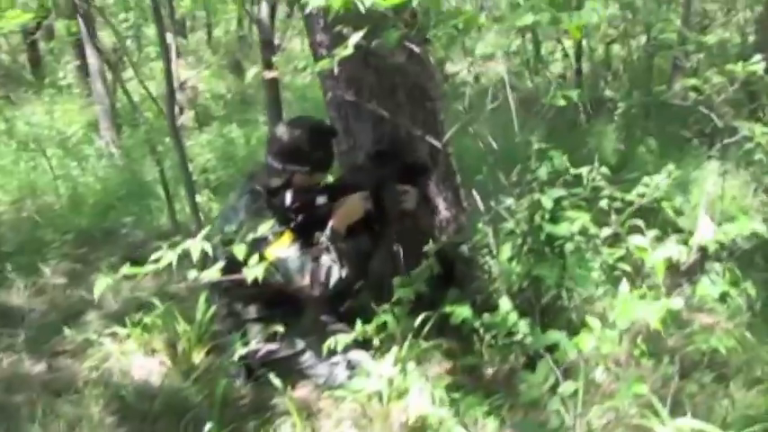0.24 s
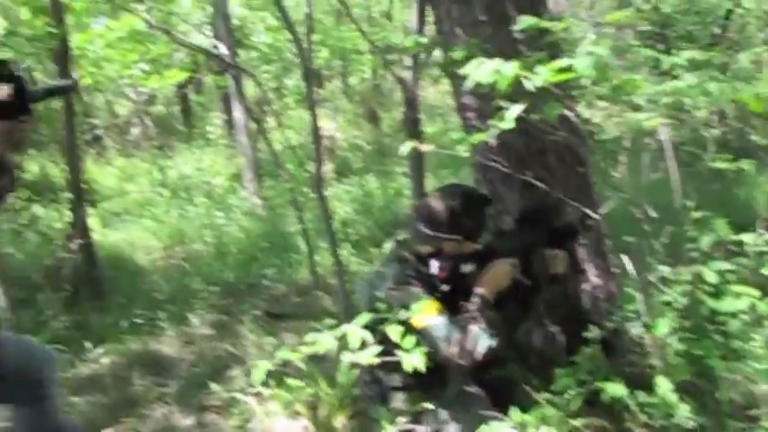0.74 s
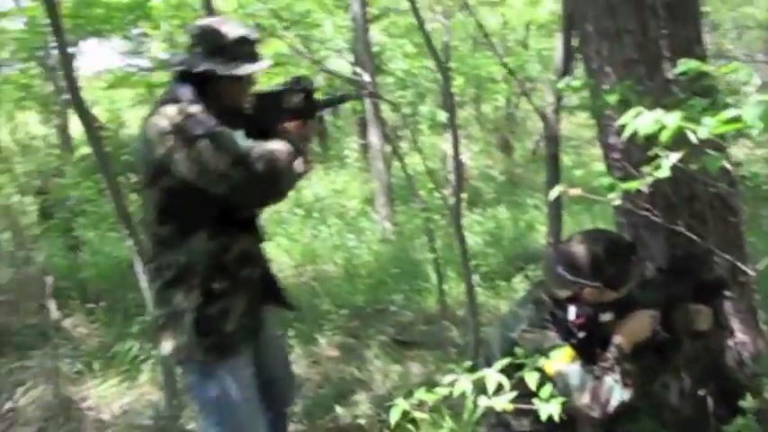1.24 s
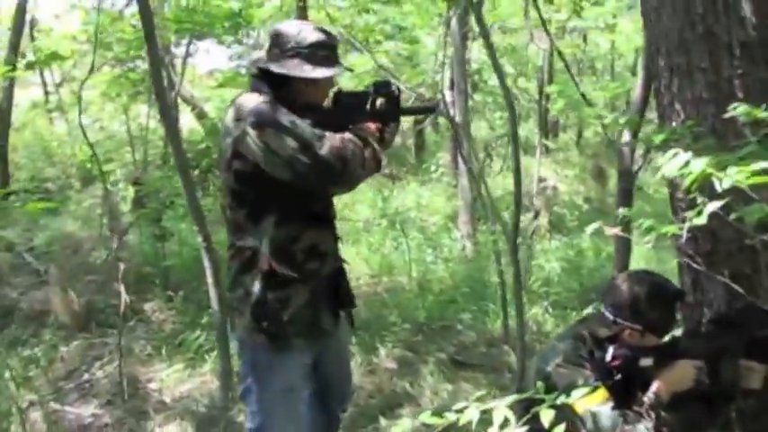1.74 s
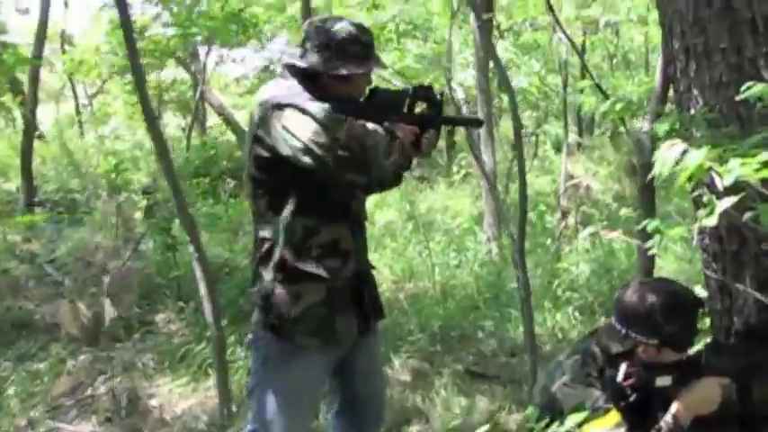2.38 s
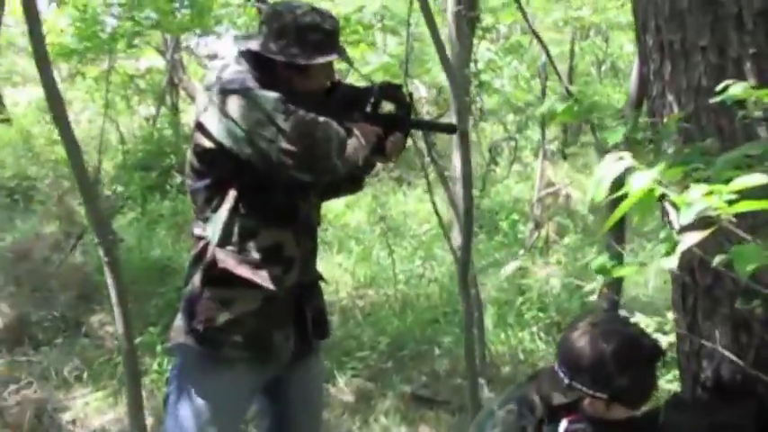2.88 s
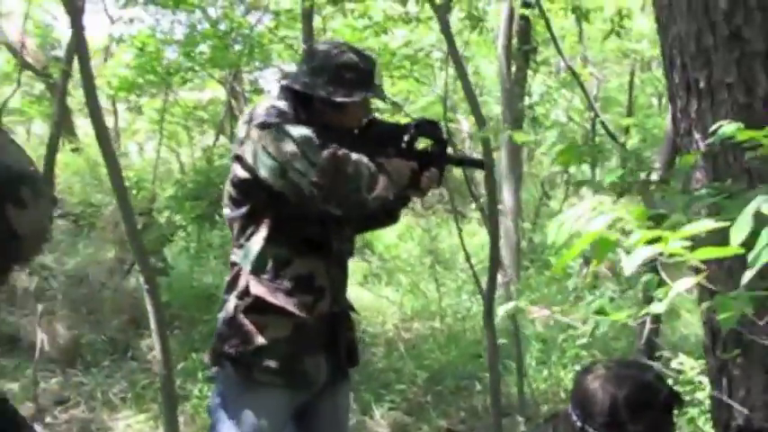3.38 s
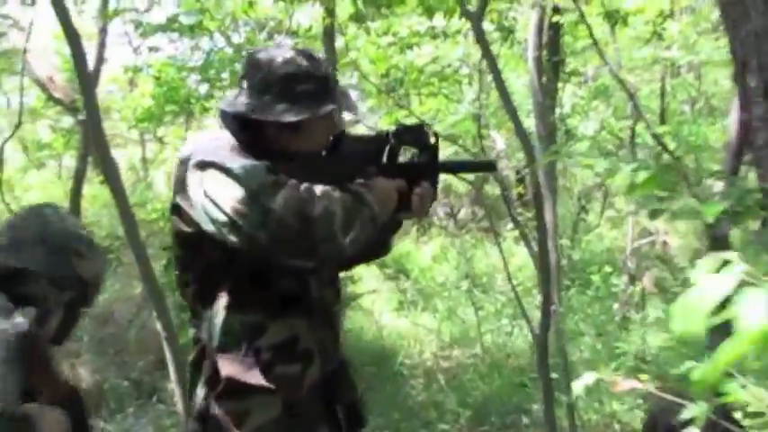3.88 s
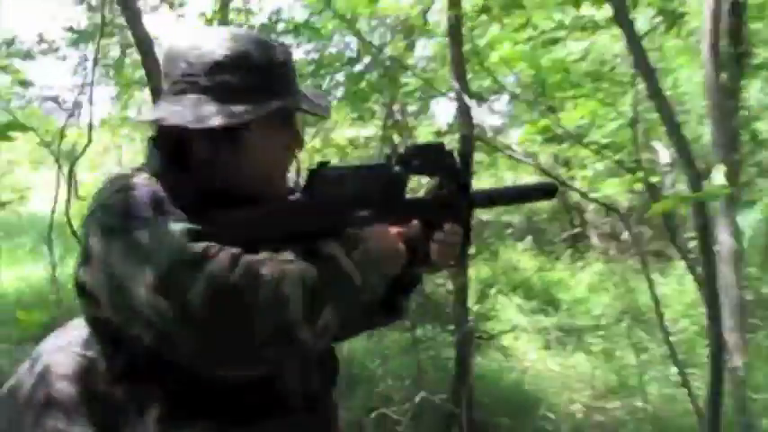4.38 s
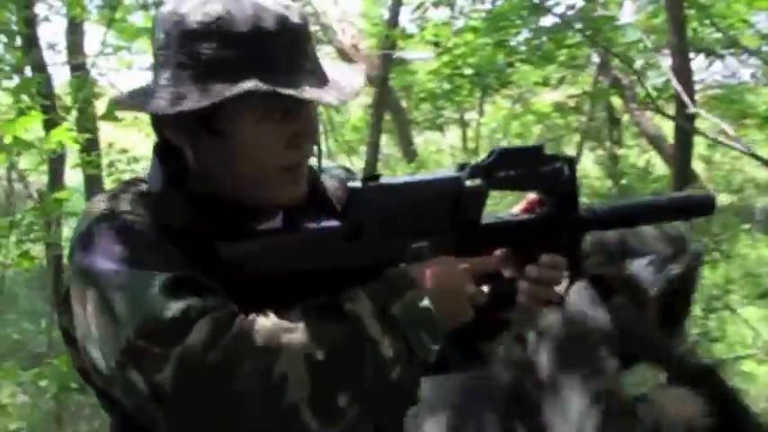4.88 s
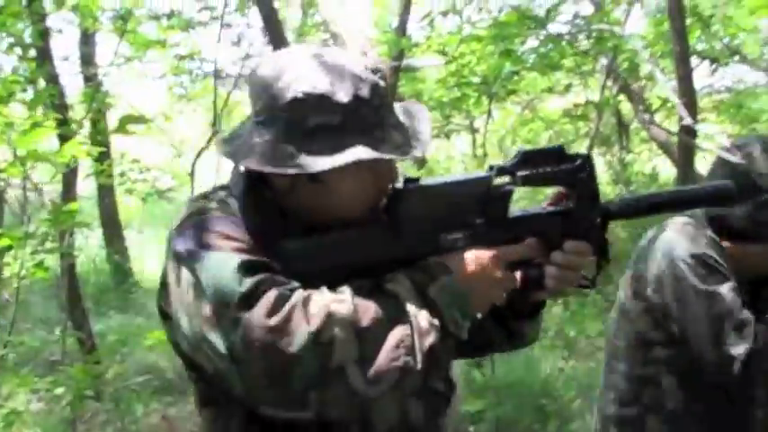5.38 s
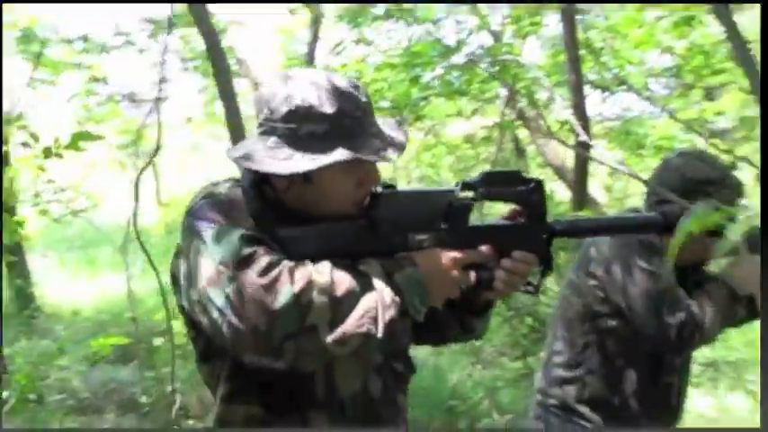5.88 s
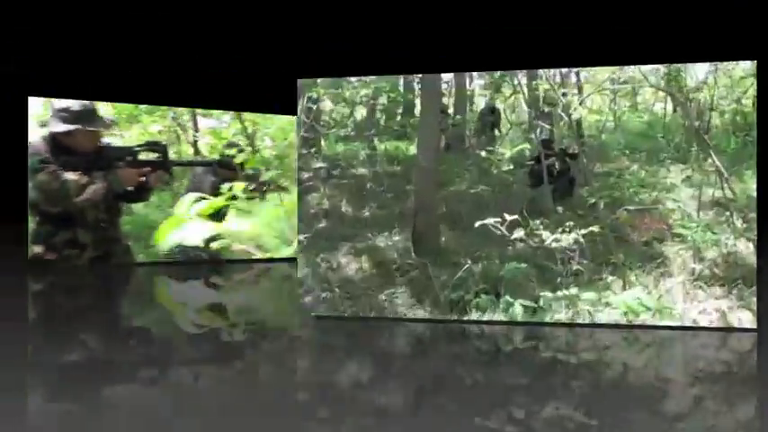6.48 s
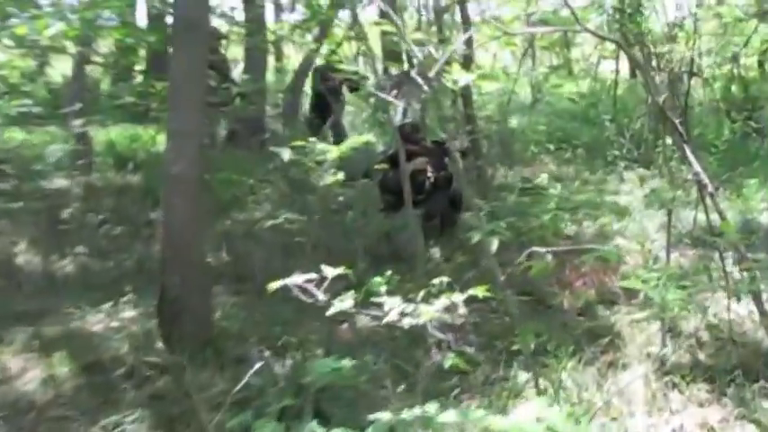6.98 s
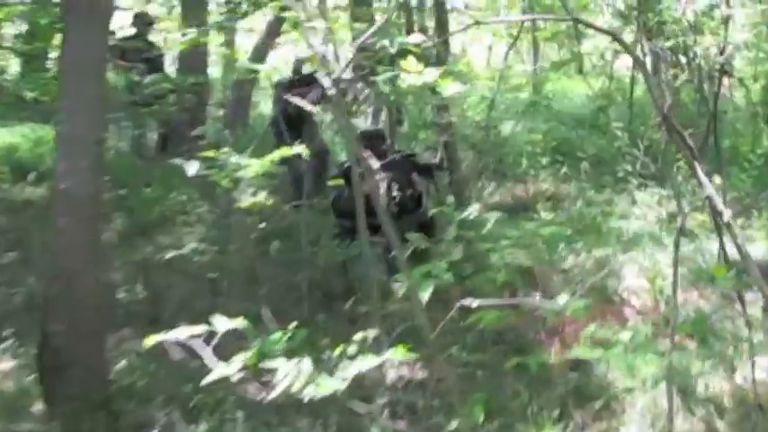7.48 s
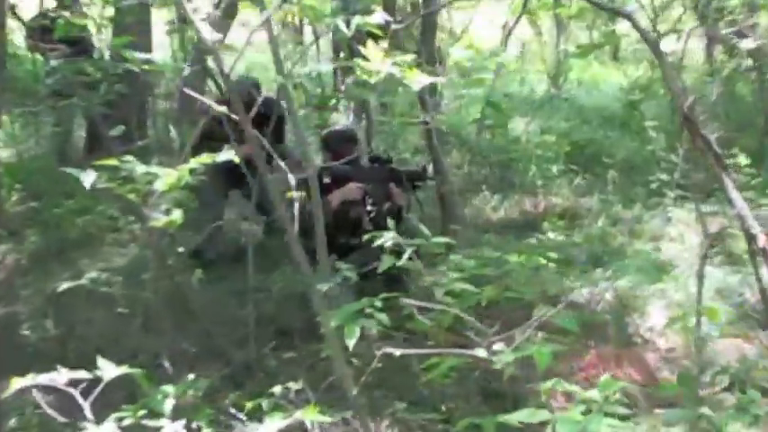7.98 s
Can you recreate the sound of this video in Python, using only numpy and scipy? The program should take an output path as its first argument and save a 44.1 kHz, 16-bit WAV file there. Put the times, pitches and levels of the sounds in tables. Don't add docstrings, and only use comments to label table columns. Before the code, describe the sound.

Dry leaf hiss and cloth scraping begin, dipping briefly as the scene changes. Spaced plasticky cracks follow from two close air guns, with motor whirs, latch clacks and loose-part rattles between them. Movement and twig snaps fill a pause before one continuous rapid burst close by. The last seconds move farther away: paired single shots and a lighter automatic run through softer foliage. A small stereo microphone in open woodland hears little bass and only faint scattered echoes.

```python
import sys
import numpy as np
from scipy import signal
from scipy.fft import rfft, irfft
from scipy.io import wavfile
from scipy.ndimage import uniform_filter1d

SR = 44100
rng = np.random.default_rng(int(sys.argv[2]) if len(sys.argv) > 2 else 0)


def transcribe(signal):
    frames = np.atleast_2d(signal).T
    limited = np.clip(frames, -1, 1)
    pcm = np.round(limited * 32767).astype(np.int16)
    wavfile.write(sys.argv[1], SR, pcm)


def linear_from_db(decibels):
    return 10 ** (np.asarray(decibels, float) / 20)


N = 363384

# start_s, crack_db, thump_db, brightness_db, whine_db
RIGHT_SHOTS = [(0.841, 1, -14.5, -7.5, -18), (1.233, -6, -18, 3, -53), (1.6649, -4.5, -14, -2, -59),
               (1.7634, -4, -18.5, 1, -37), (2.1772, -3.5, -14.5, -1, -26.5),
               (2.8502, -4.5, -14.5, 1, -21.5), (3.333, -4.5, -16.5, -0.5, -29)]
# start_s, crack_db, thump_db, brightness_db, whine_db
NEAR_SHOTS = [(2.329, 2, -9, -2, -33), (2.602, -1, -5.5, -12, -26.5), (2.841, 1, -5, -22, -25),
              (3.0923, 0, -6, -22, -32), (3.306, 1, -6, -20, -33), (3.5602, -3.5, -6.5, -24, -48),
              (3.792, 0.5, -6, -15, -31.5), (4.017, 2, -4, -16, -27.5)]
# (pitch_hz, t60_ms, level_db)
MAKES = [
    ((-17, 5), (6., -6), (-9, 70), (3.6, 45, 700), (293, 62, 0)),
    ((-14, 4), (2.2, -6), (-15, 50), (.4, 35, 850), (595, 110, -12)),
    ((-12, 5), (3.3, -7), (-15, 60), (3.3, 40, 540), (265, 40, -3)),
    ((-21, 5), (3.2, -9), (-21, 50), (3.6, 40, 950), (570, 60, -12)),
    ((-30, 3), (1.6, -8), (-12, 30), (.1, 40, 650), (590, 60, -8)),
    ((-26, 5), (6.9, -11), (-22, 70), (6.2, 40, 1100), (680, 50, -12)),
    ((-40, 1), (1.4, -14), (-17, 45), (.4, 25, 600), (600, 40, -15)),
]
# pitch_hz, level_db, t60_ms
BODIES = [
    [(640, 3.5, 44), (747, 11, 35), (1110, -7, 31), (1440, -15, 30)],
    [(340, -4, 65), (554, 5.5, 30), (928, 12.5, 26), (1200, -1, 8.2)],
    [(530, 6.5, 24), (824, 3.5, 26), (1430, -22, 40), (1630, -7, 58)],
    [(818, -4, 85), (1000, 8.5, 30), (1360, -2, 41), (1550, -10, 45)],
    [(684, 5, 19), (342, -19, 77)],
    [(1085, 1, 28), (1560, -3, 27), (1380, -13, 22)],
    [(580, 0, 4.3)],
]
# left_right_db, left_port_lag_samples
PLACES = [
    (-3.5, 4),
    (0, 3),
    (-5, 4),
    (-1, 1),
    (-1.5, 3),
    (-0.5, 1),
]
SMALL_PUFF = (0.075, 5.2, 4.4, 177)


def evened(x):
    return x / np.sqrt(np.mean(x ** 2) + 1e-20)


def read(points, hz):
    f, value = np.transpose(points)
    return np.interp(np.log(hz + 1), np.log(f + 1), value)


def add(mix, s, sound):
    part = mix[:, round(s * SR):][:, :sound.shape[1]]
    part += sound[:, :part.shape[1]]


def colour(x, gain):
    return irfft(rfft(x) * gain(np.fft.rfftfreq(x.shape[-1], 1 / SR)), x.shape[-1])


def pair(count, direct=0.):
    # pitch_hz, left_right_likeness
    likeness = [(60, 1), (180, 0.98), (550, 0.97), (1650, 0.74), (4970, -1.5), (15000, -1.05)]
    a, b = rfft(rng.standard_normal((2, count)))
    same = np.maximum(read(likeness, np.fft.rfftfreq(count, 1 / SR)), direct)
    same = np.clip(same, 0, 1)
    return irfft(np.array([a, same * a + np.sqrt(1 - same ** 2) * b]), count)


def placed(x, pan_db, lag):
    shade = lambda hz: linear_from_db(np.outer([.5, -.5], pan_db * hz / (hz + 500)))
    delayed = np.array([x[0], np.roll(x[1], -round(lag))])
    return colour(delayed, shade)


def resonate(x, hz, width):
    turn = np.exp(2j * np.pi * np.cumsum(hz * np.ones(x.shape[-1])) / SR)
    r = np.exp(-np.pi * width / SR)
    return 2 * (turn * signal.lfilter([(1 - r) ** 2], [1, -2 * r, r * r], x / turn)).real


def hit(row, make, body, place, air=SMALL_PUFF):
    # pitch_hz, level_db
    crack_curve = [(200, -17.5), (700, -6.5), (1600, -2), (3000, -2), (4500, -1.5), (7500, -1.5),
                   (11000, -14), (16000, -18)]
    s, crack_db, thump_db, bright_db = row
    (hiss_db, lead), (echo, echo_db), (clatter_db, clatter_t60) = make[:3]
    (lag, thump_t60, thump_hz), (ring_hz, ring_t60, ring_db) = make[3:]
    puff_size, puff_half_ms, puff_early_ms, bass_limit_hz = air
    front = 441
    ms = (np.arange(5120) - front) * 1000 / SR
    count = len(ms)
    after = lambda start, t60: (ms >= start) * linear_from_db(-60 * np.maximum(ms - start, 0) / t60)

    def tone(hz):
        tilt = 0.5 * np.clip(np.log2((hz + 1) / 4500), -1, 1)
        return linear_from_db(read(crack_curve, hz) + bright_db * tilt)

    clicks = 0.08 * after(0, 8) * rng.standard_normal(count)
    clicks[[front, front + 2, front + round(echo * SR / 1000)]] = 1, -.85, linear_from_db(echo_db)
    crack = colour(clicks, tone)
    crack = 1.5 * crack / abs(crack).max()

    lumps = linear_from_db(2.2 * evened(uniform_filter1d(rng.standard_normal(count), 40)))
    loose = evened(colour(pair(count, 0.72), lambda hz: tone(hz) * hz / (hz + 900) / (1 + hz / 9000)))
    approach = 1.63 * (ms < .3) * np.clip(1 + ms / lead, 0, 1)
    clatter = linear_from_db(clatter_db) * loose * lumps * (after(0.35, clatter_t60) + approach)

    jet = np.cos(np.pi * np.clip(ms / lead + .5, -.5, .5)) ** 2
    hiss = linear_from_db(hiss_db + min(bright_db, 0)) * evened(resonate(pair(count, 1.0), 9500, 5500)) * jet

    push = evened(resonate(pair(count, 1.0), thump_hz, 0.61 * thump_hz)) * after(lag - 1, thump_t60)
    knock = 0
    for hz, db, t60 in body:
        mode = np.sin(2 * np.pi * hz * rng.uniform(0.94, 1.02) * (ms - lag) / 1000)
        knock = knock + linear_from_db(db) * mode * after(lag, t60)
    push = .45 * push / abs(push).max() + knock / abs(knock).max()
    swing = np.sin(2 * np.pi * ring_hz * rng.uniform(0.98, 1.02) * (ms - lag) / 1000)
    ring = linear_from_db(ring_db) * swing * after(lag, ring_t60) * (1 - after(lag, 8))
    boom = colour(push + ring, lambda hz: hz ** 6 / (hz ** 6 + bass_limit_hz ** 6))
    puff = puff_size * np.sin(np.pi * np.clip((ms - lag + puff_early_ms) / puff_half_ms, 0, 2))

    sound = linear_from_db(crack_db) * (crack + clatter + hiss) + linear_from_db(thump_db) * (boom + puff)
    return s - front / SR, placed(sound, *place)


def rounds(levels, start_s, period_s, early_s, remaining):
    count, settle_rounds, scatter_db = 14, 3., .7
    k = np.arange(count)
    db = [np.interp(k, [0, settle_rounds, count - 1], row) for row in levels]
    db = np.transpose(db) + scatter_db * rng.standard_normal((count, 3))
    return np.column_stack([start_s + period_s * k - early_s * remaining ** k, db])


def shots(guns, burst):
    # first_db, settled_db, last_db
    far_levels = [
        (-8.5, -2.5, -4),
        (-20.5, -20.5, -25.5),
        (-2, -3, 2),
    ]
    # start_s, crack_db, thump_db, brightness_db
    clacks = [(0.4697, -12, -24, -2), (0.6152, -32, -21, 3.0), (1.05, -28, -25.5, 5),
              (1.4009, -16, -29, -5), (1.9136, -50, -26, 10), (1.9707, -33, -27, -3),
              (2.004, -27, -31.5, 5), (2.4644, -7, -13, -7), (2.5362, -33, -24, 0.0), (2.727, -9, -18.5, 9),
              (2.779, -10.5, -21, -1), (2.9712, -8, -20.5, -3), (3.027, -11.5, -28, -4),
              (3.217, -18.5, -23, -28), (3.246, -35, -19.5, -8), (3.4382, -13.5, -19.5, -10),
              (3.677, -19.5, -23, -13), (3.7327, -35, -20.5, -7.0), (3.926, -8.5, -21, -13),
              (3.954, -41, -16.5, -6.0), (4.137, -20.5, -19.5, -44), (0.981, -28, -20.5, -3),
              (4.723, -35, -22, 0), (4.76, -30, -20.5, 0), (4.962, -30, -31, 0), (4.9216, -26, -33, -4),
              (5.166, -19, -26, -10), (8.237, -19.5, -28, -5)]
    # start_s, crack_db, thump_db, brightness_db
    far_shots = [(6.8259, -2, -17, -1), (6.9161, -1.5, -18, -0.5), (7.471, -2.5, -17, 1),
                 (7.555, 1.5, -20.5, 2), (7.9674, -7, -26, -14), (7.997, 0, -16, 7)]
    far_burst = rounds(far_levels, start_s=7.1193, period_s=.0602, early_s=.0123, remaining=.4)
    sources = [RIGHT_SHOTS, NEAR_SHOTS, burst, far_burst, clacks, far_shots]
    puffs = [(.25, 4.6, 12, 117), (.11, 4.6, 7, 117), (0.08, 6.85, 17.3, 200)] + [SMALL_PUFF] * 3
    for rows, make, body, place, air in zip(sources, MAKES, BODIES, PLACES, puffs):
        for row in rows:
            add(guns, *hit(row[:4], make, body, place, air))


def gears(row, box, place, coast=.085):
    # pitch_hz, level_db
    rattle_curve = [(120, -50), (200, -18.5), (380, -2), (519, -0.5), (659, -4.5), (791, -0.5), (1590, 4),
                    (9060, -3.5), (14100, -34), (16000, -41)]
    # swell_s, period_s
    cycle = (5.636, .0605)
    start, full, release, whine_db, rattle_db, hum_db, top, squeal = (*row, 1, 1)[:8]
    mesh_hz, slow, body_hz, width, half_db, throb, brake, clean, early, late, ringing = box
    t = np.arange(start, release + coast, 1 / SR)
    t = t[:len(t) // 2 * 2]
    smooth_noise = lambda size: evened(uniform_filter1d(rng.standard_normal(len(t)), size))

    marks = [start, full, release, release + coast]
    coasting = lambda *shares: marks[:3] + [release + k * coast for k in shares]
    run_up = np.interp(t, coasting(.6, .88), [0, 1, 1, .65, 0])
    speed = slow + (top - slow) * np.sin(np.pi / 2 * run_up)
    speed = speed * (1 + .012 * smooth_noise(500))
    edges = signal.windows.tukey(len(t), 0.0053 / (t[-1] - t[0]))
    load = np.interp(t, marks, [0.092, 0.92, 1.0, 0.092])
    strain = np.interp(t, coasting(.07, .5, .65, .85, 1),
                       [early, 1, late, .08, .06, squeal * brake, squeal * brake, 0])
    shake = np.interp(t, coasting(0.46, 1), [.25, .9, 1, ringing, .1])

    noise = pair(len(t), 1.0)
    teeth = linear_from_db(1.9 * smooth_noise(120))
    gusts = linear_from_db(3.2 * smooth_noise(350))
    whine = clean * np.sin(2 * np.pi * np.cumsum(mesh_hz * speed) / SR)
    whine = whine + 0.6 * evened(resonate(noise, mesh_hz * speed, 190))
    whine = whine + .6 * evened(resonate(noise, 2.04 * mesh_hz * speed, 200))
    rattle = evened(colour(pair(len(t), 0.64) * teeth, lambda hz: linear_from_db(read(rattle_curve, hz))))

    hum = evened(resonate(noise[1] * teeth, body_hz, width))
    hum = hum + linear_from_db(half_db) * evened(resonate(noise[0], body_hz / 2, 54))
    beats = (t - cycle[0]) / cycle[1]
    turn = rng.random(20)[np.floor(beats + .5).astype(int) % 20]
    hum = (hum + 4.5 * throb * np.sin(2 * np.pi * (body_hz * t + turn))) / (1 + 3 * throb)
    hum = hum * (1 + throb * np.cos(2 * np.pi * beats))

    sound = linear_from_db(whine_db) * strain * evened(whine * gusts)
    sound = sound + linear_from_db(rattle_db) * load * rattle + linear_from_db(hum_db) * shake * hum
    return start, placed(edges * sound, *place)


def gear_runs(guns):
    # mesh_hz, lowest_speed_share, body_hz, body_width_hz, half_pitch_db, throb_depth,
    # brake_squeal, clean_whine_share, whine_share_at_trigger, whine_share_at_release, coasting_hum_share
    boxes = [
        (1780, .52, 1140, 240, -30, 0, .3, 1, .7, .7, .3),
        (1760, .84, 580, 180, -30, 0, .03, .5, .05, .08, 1.3),
        (1720, .75, 526, 80, -3, .75, .03, .4, .2, 1, .2),
        (1570, .88, 1000, 200, -30, 0, .04, .9, .5, 1, .3),
    ]
    # trigger_before_s, full_speed_before_s, top_speed_share, brake_squeal_share
    right_winds = [(.076, .013, .96, .8), (.082, .01, 1, .5), (.082, .01, 1, .5), (.082, .01, 1, .5),
                   (.082, .022, .97, .3), (.065, .001, .9, .3), (.075, .01, .95, .3)]
    # trigger_s, release_s, whine_db, rattle_db, hum_db
    right_held = [(.742, .82, -60, -38, -27), (1.67, 1.76, -47, -34, -48)]
    # trigger_s, release_s, whine_db, rattle_db, hum_db
    burst_held = [
        (5.39, 5.46, -30, -26.5, -55),
        (5.455, 6.27, -42, -31, -40.5),
    ]
    # trigger_s, release_s, whine_db, rattle_db, hum_db, top_speed_share (if not full)
    far_held = [(6.6, 6.68, -78, -67, -51.5), (6.75, 6.822, -39.5, -41.5, -53),
                (6.83, 6.925, -42, -34, -60), (7.07, 7.9, -46.5, -34.5, -55),
                (7.413, 7.459, -30.5, -33, -48), (7.44, 7.535, -37, -34, -46),
                (7.88, 7.94, -40, -40, -60, 1.03), (7.915, 7.987, -32, -32, -52, .97),
                (7.98, 8.055, -41, -43, -60, .96)]
    near_winds = [(.066, .032, 1, 1)] * len(NEAR_SHOTS)
    release_s, spin_up_s = .0035, .045

    def single(rows, winds, rattle_db, hum_db):
        return [(s - pull, s - full, s + release_s, whine_db, rattle_db, hum_db, *speed)
                for (s, *_, whine_db), (pull, full, *speed) in zip(rows, winds)]

    held = lambda rows: [(s, s + spin_up_s, *rest) for s, *rest in rows]
    remaining = single(RIGHT_SHOTS, right_winds, rattle_db=-27, hum_db=-39) + held(right_held)
    near = single(NEAR_SHOTS, near_winds, rattle_db=-26.5, hum_db=-35.5)
    for rows, box, place in zip([remaining, near, held(burst_held), held(far_held)], boxes, PLACES):
        for row in rows:
            add(guns, *gears(row, box, place))


def small_impacts(guns, burst):
    # start_s, peak_db, brightness_db, left_right_db
    snaps = [(0.128, -10, -24, -0.5), (0.546, -6, -2, 6), (0.594, -8, 0, 1.5), (0.862, -26, -3, -14),
             (0.9804, 0, -8, -4), (1.0749, -2.5, 6, 8), (1.1975, -18, -15, -3), (1.2602, -12, -28, -10),
             (1.321, -0.5, 6, -8), (1.5333, -7, 14, -1), (1.8462, -17, -15, -2.5), (1.886, -7, 4, 4),
             (2.1057, -3.5, -8, -2.5), (2.406, -8, -6, 8), (3.2796, -15, -18, 4), (3.6454, -15, -14, 1.5),
             (4.1045, -13, -19, 1), (4.6562, -10, 23, 4), (4.7229, 1.5, 5, -2), (4.7604, -4, 1, 0.5),
             (4.9494, -11, -6, 3), (4.9556, -6, 4, 3), (4.9632, 3, 17, 3.0), (5.4335, -11, -18, -4),
             (6.312, -10, 3, -1.5), (6.3572, -6.5, -5, 3), (6.418, -9.5, -1, 3.5), (6.536, -16, 3, -3.5),
               (7.227, -9, 19, 0.5), (7.77, -13, 13, -7)]
    # after_shot_s, peak_db, brightness_db, left_right_db
    catches = [
        (-.013, -10, -9, 1),
        (.044, -11, -3, 0.5),
    ]
    # start_s, peak_db,
    # brightness_db, left_right_db
    dull_hits = [(0.9715, -19, -11, -2), (1.086, -22, 13, 5), (1.2255, -9.5, -22, -4), (1.33, -15, 12, -8),
                 (1.693, -10.5, -5, 2), (1.708, -14, -10, 1.5), (4.415, -34, -20, -2), (4.448, -27, -9, -5),
                 (4.465, -44, -21, -2), (4.488, -39, -25, -6), (4.506, -31, 5, -3), (5.243, -32, -15, -2),
                 (5.255, -19, -3, 5), (5.308, -27, -8, -7), (5.8141, -15, -18, -2), (6.852, -20, -9, 0),
                 (6.9462, -19.5, -17, -2), (6.96, -23.5, -15, -2), (7.096, -19, 6, 0), (8.019, -19, -14, 0)]
    soft_make = ((-40, 1), (2.3, -3), (-6, 40), (.4, 25, 600), (600, 40, -15))
    bark_tick = ((8.209, -26, -22, -5), ((-40, 1), (1.4, -14), (-17, 30), (.1, 14, 2400), (3300, 14, -6)),
                 [(2900, 0, 14)], (1, 0))
    reload = [(.035, -19, -11, -3.5)]
    caught = lambda rows, parts: [(row[0] + lag, *rest) for row in rows for lag, *rest in parts]
    sharp = snaps + caught(NEAR_SHOTS[1:], catches)
    soft = dull_hits + caught(burst[:-1], reload)
    for rows, make in [(sharp, MAKES[-1]), (soft, soft_make)]:
        for s, peak_db, bright_db, pan_db in rows:
            row = (s, peak_db, peak_db - 30.0, bright_db)
            add(guns, *hit(row, make, BODIES[-1], (pan_db, -1.1 * pan_db)))
    add(guns, *hit(*bark_tick))


def wood(x):
    # pitch_hz, t60_s
    decay = [(200, 0.03), (1000, 0.061), (4000, 0.47), (12000, 0.24)]
    taps = rng.choice([-1., 1.], (2, SR // 2)) * (rng.random((2, SR // 2)) < .05)
    taps[:, :350] = 0
    hz, t, z = signal.stft(taps, SR, nperseg=256)
    tail = signal.istft(z * linear_from_db(-60 * t / read(decay, hz)[:, None]), SR, nperseg=256)[1]
    return signal.fftconvolve(x.mean(0)[None], tail / np.linalg.norm(tail[0]), axes=1)[:, :N]


def scrape():
    # start_s, level_db
    drag = [
        (.22, -38),
        (.3, -39),
        (0.411, -30),
        (.45, -25.5),
        (.55, -25.5),
        (.6, -60),
    ]
    # pitch_hz, width_hz, level_db
    cloth = [
        (4030, 540, -1),
        (1875, 240, -8.5),
        (4880, 500, -5),
    ]
    count = SR
    rough = pair(count, 0.4) * linear_from_db(3.2 * evened(uniform_filter1d(rng.standard_normal(count), 150)))
    bands = sum(linear_from_db(db) * evened(resonate(rough, hz, width)) for hz, width, db in cloth)
    return 0, bands * linear_from_db(np.interp(np.arange(count) / SR, *np.transpose(drag)))


def stirring(t):
    # start_s, leaf_hiss_db,
    # footfall_crunch_share_db
    movement = [(0, -25.5, -11), (0.1, -29.5, -8), (0.24, -26.5, -9), (.62, -25, -6), (.92, -39.5, 4),
                (1.16, -35.5, -4), (1.4, -31.5, -17), (1.82, -39, -4.5), (2.15, -31, 0), (3.3, -34.5, -13),
                (3.66, -38.5, -2), (4.35, -40, -5), (5.02, -36, -5), (5.6, -29.5, -7), (6.24, -29.5, -13),
                (6.34, -34.5, -5), (6.5, -41, -10),
                (6.72, -47, -0.5),
        (7.05, -37, -8.5),
        (7.3, -34, -19),
        (7.9, -33, -29),
        (8.24, -39, -12),
    ]
    # centre_s, half_length_s, hiss_db, crunch_db, brightness_db
    swishes = [(0.51, 0.072, -22, -48, -7), (0.781, 0.099, -18, -31, -7.5),
               (1.036, 0.095, -28.5, -54, -4.5), (1.287, 0.047, -30, -36, -14),
               (1.504, 0.16, -39.5, -40, -10), (1.955, 0.06, -36.5, -55, -4), (2.445, 0.11, -26, -39, -1.5),
               (2.706, 0.24, -42.5, -31, 15), (2.937, 0.21, -28, -41, -2), (3.1, 0.14, -50, -30.5, -6),
               (3.865, 0.1, -26.5, -33.5, -2.2), (4.178, 0.14, -34, -46.5, -1.5),
               (4.543, 0.075, -34, -63, -6), (4.723, 0.089, -27.5, -43, -4), (4.741, 0.011, -23, -48, 0),
               (4.88, 0.041, -35, -59, -2), (5.199, 0.096, -25, -39, -1.5), (6.28, 0.075, -43, -52, -21),
               (8.082, 0.085, -42, -43, 9)]
    s, hiss_db, share_db = np.transpose(movement)
    hiss = linear_from_db(2 * np.interp(t, s, hiss_db))
    crunch = hiss * linear_from_db(2 * np.interp(t, s, share_db))
    bright = hiss * np.where(t < 5.5, -2, -5.5)
    for at, half, swish_db, crunch_db, bright_db in swishes:
        bump = np.exp(-2 * ((t - at) / half) ** 2)
        hiss = hiss + linear_from_db(2 * swish_db) * bump
        crunch = crunch + linear_from_db(2 * crunch_db) * bump
        bright = bright + linear_from_db(2 * swish_db) * bump * bright_db
    return np.sqrt(hiss), np.sqrt(crunch), bright / hiss


def rustle(spectrum, column, per_s, spread_db, share, tilt):
    # start_s, left_right_db
    side = [
        (0.0, 1),
        (6.52, -0.5),
        (8.24, 0),
    ]
    t = np.arange(N) / SR
    sizes = linear_from_db(spread_db * np.minimum(rng.exponential(1, N), 4))
    grains = sizes * (rng.random(N) < per_s / SR)
    grains = signal.lfilter([1], [1, -.97], grains)
    source = pair(N, 0.015) * (1 + share * evened(grains))
    hz, frames, z = signal.stft(source, SR, nperseg=512)
    patches = uniform_filter1d(rng.standard_normal(z.shape[:0:-1]).T, 12, 0)
    patches = evened(uniform_filter1d(patches, 8, 1))
    gains = stirring(frames)
    bright_db = tilt * np.outer(np.clip(np.log2((hz + 1) / 6000), -1, 1), gains[2] + 2)
    z = z * linear_from_db(read(spectrum, hz)[:, None] + bright_db + 1.6 * patches)
    x = signal.istft(z, SR, nperseg=512)[1][:, :N]
    pan_db = np.interp(t, *np.transpose(side))
    return evened(x) * np.interp(t, frames, gains[column]) * linear_from_db(np.array([[.5], [-.5]]) * pan_db)


def undergrowth():
    # pitch_hz, level_db
    leaf = [(880, -31.5), (1500, -16), (1950, -12.5), (2170, -10.5), (2970, -10), (4050, -5),
            (12500, -10.5), (15900, -21), (16500, -56)]
    # pitch_hz, level_db
    litter = [(59, -53), (100, -11.5), (567, 2), (1040, 1.5), (1930, -1.5), (2280, -4), (4040, -4),
              (5000, -8), (6500, -6.5), (11000, -120)]
    brush = rustle(leaf, column=0, per_s=450, spread_db=8.0, share=0.21, tilt=1.0)
    brush = brush + rustle(litter, column=1, per_s=190, spread_db=-3.5, share=0.41, tilt=0)
    add(brush, *scrape())
    return brush


def wind():
    # start_s, level_db
    strength = [(0.0, -41), (0.3, -61), (0.62, -71), (1.51, -78), (2.64, -49), (3.33, -75), (5.94, -73),
                (6.59, -72), (7.6, -75), (8.24, -75)]
    x = colour(rng.standard_normal((2, N)), lambda hz: hz / (hz + 20) / (1 + (hz / 60) ** 2))
    return evened(x) * linear_from_db(np.interp(np.arange(N) / SR, *np.transpose(strength)))


def scene():
    # first_db, settled_db, last_db
    burst_levels = [
        (1.5, -4, -4),
        (-10.5, -18.5, -21.5),
        (-0.5, -4.5, -7),
    ]
    burst = rounds(burst_levels, start_s=5.4795, period_s=.0605, early_s=.0154, remaining=.29)
    guns = np.zeros((2, N))
    shots(guns, burst)
    gear_runs(guns)
    small_impacts(guns, burst)
    echoing = guns + linear_from_db(-12.5) * wood(guns)
    thin = colour(echoing, lambda hz: hz ** 2 / (hz ** 2 + 120 ** 2))
    return thin + undergrowth() + wind()


def band_limit(x):
    return signal.sosfilt(signal.butter(12, 16810, fs=SR, output="sos"), x)


def record(dry):
    # change_s, fade_out_s, fade_in_s
    change = (0.184, 0.029, 0.056)
    s, out, back = change
    fade = np.interp(np.arange(N) / SR, [s - out, s, s + 0.0074, s + back], [0.62, 0.055, 0.04, 0.99])
    ceiling = .97
    limited = ceiling * np.tanh(dry * fade / ceiling)
    mix = colour(limited, lambda hz: 1 / (1 + (hz / 16000) ** 40))
    return band_limit(mix)


dry = scene()
out = record(dry)
transcribe(out)
```